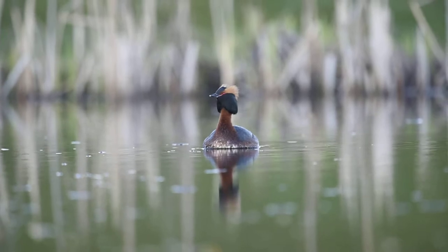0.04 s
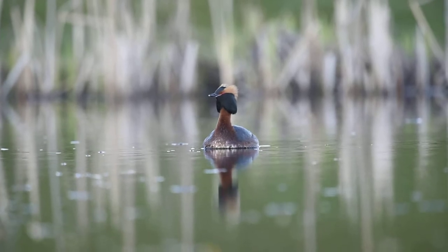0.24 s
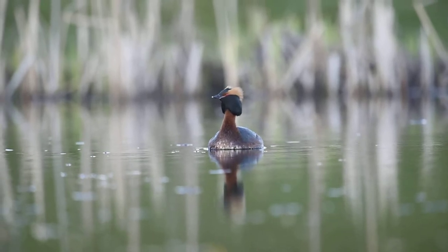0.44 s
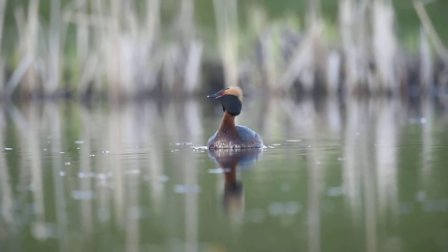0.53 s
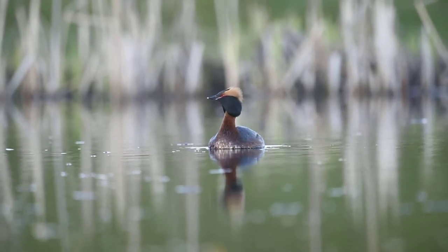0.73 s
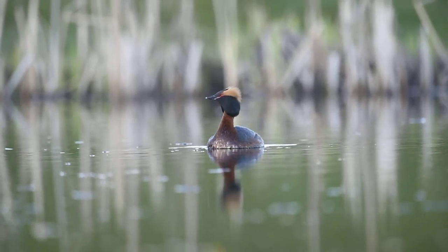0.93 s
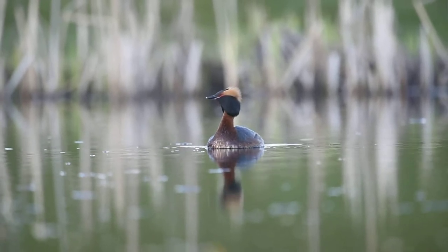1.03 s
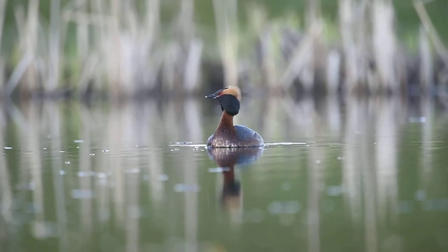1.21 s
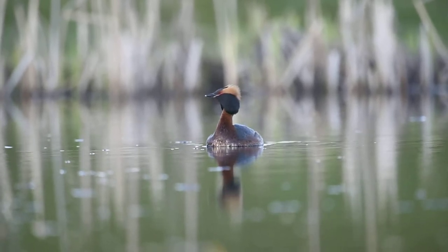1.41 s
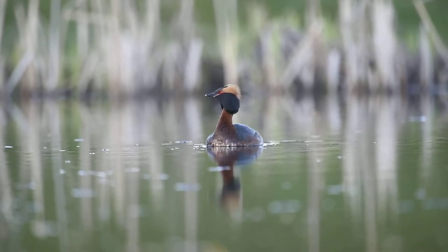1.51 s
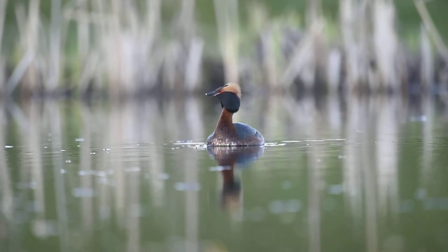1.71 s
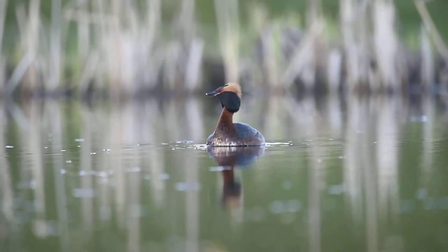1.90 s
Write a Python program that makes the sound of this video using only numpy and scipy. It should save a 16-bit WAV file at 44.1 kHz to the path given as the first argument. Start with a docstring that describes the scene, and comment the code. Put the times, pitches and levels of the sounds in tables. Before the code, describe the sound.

A waterbird on a calm pond gives a quick soft hoot at 0.45-0.52 s, then a thin quavering wail from 0.61 to 1.37 s, around 900-1000 Hz, sagging and turning rough and hoarse after 1.24 s, with a faint short echo. Irregular low wind thumps hit the microphone throughout, strongest near 0.93 s, over quiet hiss. Faint ticks come early, a tiny water plip at 1.5 s, and a distant fuzzy peep at 1.6-1.8 s.

```python
"""Waterbird on a calm pond

A waterbird gives a short hoot, then a thin wavering wail that ends hoarse: three gliding harmonics,
a band of rasp and a faint echo. Light wind is shaped noise plus low thumps of a few damped swings.
Under it lie a steady noise hiss, faint high noise ticks, a plip on the water made of three tiny
cosine bursts, and a far bird's peep from one fuzzy gliding tone."""
import sys
import numpy as np
from scipy import signal
from scipy.io import wavfile
from scipy.ndimage import uniform_filter1d

SR = 44100
rng = np.random.default_rng(int(sys.argv[2]) if len(sys.argv) > 2 else 0)


def to_wav(sig):
    """Store sig (one row per channel, or 1-D mono) as 16-bit WAV at the path in sys.argv[1].

    Samples outside -1..1 are clipped; the rate is SR.
    """
    pcm = np.clip(np.atleast_2d(sig), -1, 1) * 32767
    pcm = np.round(pcm).astype(np.int16)
    wavfile.write(sys.argv[1], SR, pcm.T)  # frames by channels


def rack_gain(trim_db):
    """Turn a fader trim in dB into the linear factor to multiply a signal by."""
    fader = np.asarray(trim_db, float)
    return 10 ** (fader / 20)


N = 85995  # samples in the scene


def evened(x):
    """Scales a signal to rms 1."""
    return x / np.sqrt(np.mean(x ** 2) + 1e-20)


def add(mix, start_s, sound):
    """Mixes a sound in from start_s, cutting what runs past the end."""
    part = mix[round(start_s * SR):][:len(sound)]
    part += sound[:len(part)]


def band_noise(count, band_hz):
    """White noise through a gentle band-pass."""
    band = signal.butter(2, band_hz, "band", fs=SR, output="sos")
    return signal.sosfilt(band, rng.standard_normal(count))


def slow(count, top_hz):
    """Smooth random motion of rms 1: low-passed noise, with the filter's first second dropped."""
    lowpass = signal.butter(2, top_hz, fs=SR, output="sos")
    return evened(signal.sosfilt(lowpass, rng.standard_normal(count + SR))[SR:])


def coloured(spectrum, patchy_db):
    """Noise of rms 1 from random short-time spectra, with patches in time and pitch that vary its level."""
    bin_hz = np.fft.rfftfreq(2048, 1 / SR)
    real, imaginary, patches = rng.standard_normal((N // 512 + 5, 1025, 3)).T
    patches = uniform_filter1d(patches, 20, 0)  # blur over pitch
    patches = evened(uniform_filter1d(patches, 6, 1))  # then over time
    point_hz, point_db = np.transpose(spectrum)
    shape_db = np.interp(np.log(bin_hz + 1), np.log(point_hz + 1), point_db, right=-90)[:, None]
    spectra = (real + 1j * imaginary) * rack_gain(shape_db + patchy_db * patches)
    return evened(signal.istft(spectra, nperseg=2048, noverlap=1536)[1][:N])


def hiss():
    """Steady noise bed whose spectrum falls towards the treble."""
    # hiss spectrum: pitch_hz, relative_density_db
    hiss_spectrum = [(120, -50), (200, -4), (315, -8.5), (385, -9.5), (755, -9.5), (858, -10.5),
                     (1090, -12.5), (1540, -14.5), (2420, -16), (3480, -19), (15500, -36)]
    return rack_gain(-58) * coloured(hiss_spectrum, patchy_db=-0.32)


def wind_rumble():
    """Low wind noise, strongest near 55 Hz, with uneven patches."""
    # rumble spectrum: pitch_hz, relative_density_db
    rumble_spectrum = [(15, -8), (30, -3), (55, 8.5), (100, -8), (160, -8.5), (260, -14), (450, -95)]
    return rack_gain(-53) * coloured(rumble_spectrum, patchy_db=2.0)


def wind_buffets():
    """Eddies shove the microphone: short low swings, each with a higher snap and a lower heave."""
    # eddies at the microphone: peak_s, main_swing_level_db, centre_pitch_hz, half_height_width_s
    buffets = [(0.245, -32.5, 85, 0.0093), (0.276, -31, 90.4, 0.01), (0.403, -35, 49.8, 0.012),
               (0.458, -33.5, 59.3, 0.017), (0.496, -31, 78, 0.023), (0.614, -30, 77.8, 0.007),
               (0.659, -40.5, 65.7, 0.018), (0.71, -37, 69.5, 0.012), (0.785, -37, 76.7, 0.016),
               (0.891, -39.5, 50.5, 0.022), (0.928, -19.5, 119.6, 0.0077), (0.944, -31.5, 89.2, 0.012),
               (1.016, -42, 94.3, 0.014), (1.178, -37.5, 54.3, 0.011), (1.241, -44.5, 82, 0.042),
               (1.337, -43, 67.8, 0.0083), (1.386, -41, 77.8, 0.026), (1.464, -32.5, 72.7, 0.019),
               (1.498, -38.5, 85.8, 0.013), (1.54, -33.5, 77, 0.013), (1.576, -32, 58.05, 0.01),
               (1.627, -48, 55.5, 0.018), (1.69, -42.5, 68.7, 0.012), (1.79, -40.5, 62, 0.011),
               (1.817, -47, 58.4, 0.016), (1.901, -36, 84.3, 0.0069), (0.309, -39, 39.3, 0.014),
               (.75, -47.5, 109, 0.0078), (1.278, -42, 89.7, 0.025)]
    skirt_width, skirt_gain = 3.75, rack_gain(-14.5)  # wide weak skirt: share of width, gain
    sag = 0.2986  # share by which the pitch rises at the peak and sags away from it
    snap_width, snap_db, snap_pitch = 0.49, -10.5, 1.99  # share of width, dB, share of pitch
    heave_width, heave_db, heave_pitch = 3.25, -7, 0.515  # likewise
    out = np.zeros(N)
    t = np.arange(-.1, .1, 1 / SR)
    for peak_s, level_db, hz, width_s in buffets:
        core, skirt, snap, heave = (
            np.exp(-4 * np.log(2) * (t / (width_s * share)) ** 2)
            for share in (1, skirt_width, snap_width, heave_width))
        phase = rng.random(3)  # in turns
        turns = np.cumsum(hz * (1 + sag * (2 * core - 1))) / SR
        envelope = (core + skirt_gain * skirt) / (1 + skirt_gain)
        shove = envelope * np.cos(2 * np.pi * (turns + phase[0]))
        shove += rack_gain(snap_db) * snap * np.cos(2 * np.pi * (snap_pitch * hz * t + phase[1]))
        shove += rack_gain(heave_db) * heave * np.cos(2 * np.pi * (heave_pitch * hz * t + phase[2]))
        add(out, peak_s - .1, rack_gain(level_db) * shove)
    return out


def high_ticks():
    """Faint ticks: band-passed noise under a very short bell envelope."""
    # ticks: time_s (the bell peaks 1 ms later), level_db at the peak
    ticks = [(0.0854, -72), (0.1047, -66), (0.2244, -66), (0.6174, -70)]
    centre_hz, width_hz, bell_s = 11800, 4800, 0.0007
    out = np.zeros(N)
    t = np.arange(-.005, .005, 1 / SR)
    for time_s, level_db in ticks:
        puff = evened(band_noise(len(t), [centre_hz - width_hz / 2, centre_hz + width_hz / 2]))
        add(out, time_s - .004, rack_gain(level_db) * np.exp(-.5 * (t / bell_s) ** 2) * puff)
    return out


def far_peep():
    """A far bird's gliding tone, made fuzzy by slow random motion of its level and phase."""
    # peep contour: time_s, pitch_hz, level_db before the fuzz
    peep = [(1.585, 3350, -85), (1.6, 3280, -71), (1.625, 3300, -68), (1.67, 3400, -72), (1.69, 3560, -65),
            (1.703, 2950, -71), (1.722, 3120, -67), (1.735, 3450, -67), (1.77, 3480, -71), (1.8, 3400, -84)]
    fuzz_hz = 70  # top rate of the random motion
    point_s, point_hz, point_db = np.transpose(peep)
    t = np.arange(point_s[0], point_s[-1], 1 / SR)
    fuzz = .8 + .5 * slow(len(t), fuzz_hz) + .5j * slow(len(t), fuzz_hz)
    turns = np.cumsum(np.interp(t, point_s, point_hz)) / SR
    tone = (fuzz * np.exp(2j * np.pi * turns)).real
    out = np.zeros(N)
    add(out, point_s[0], rack_gain(np.interp(t, point_s, point_db)) * tone)
    return out


def water_plip():
    """A plip on the water: three tiny cosine bursts under bell envelopes."""
    # bursts: peak_s, envelope_peak_db, pitch_hz
    plip = [(1.4968, -46, 1500), (1.4988, -40.5, 1750), (1.5035, -46.5, 1500)]
    bell_s = .00038
    out = np.zeros(N)
    t = np.arange(-.005, .005, 1 / SR)
    for peak_s, level_db, hz in plip:
        burst = np.cos(2 * np.pi * (hz * t + rng.random()))
        add(out, peak_s - .005, rack_gain(level_db) * np.exp(-.5 * (t / bell_s) ** 2) * burst)
    return out


def call(contour):
    """Three harmonics on a wavering pitch; roughness shakes pitch and level, a broken voice throbs."""
    hoarse_from_s, hoarse_rise_s = 1.235, .02  # the voice breaks at the end of the wail
    roughness, hoarse_extra = .14, .5
    jitter, jitter_hz = .1, 130  # pitch share at roughness 1, top rate
    flutter_db, flutter_hz = 6, 90  # level swing at roughness 1, top rate
    throb_hz, throb_db, throb_bend = 58, 3.5, .07  # rate, level swing, pitch share
    rasp_db, rasp_band_hz, rasp_lead_s = -7, (2200, 3600), .05  # rasp rms against harmonic 3's peak
    edge_s = .008

    point_s, point_hz, *harmonics_db = np.transpose(contour)
    t = np.arange(point_s[0], point_s[-1], 1 / SR)
    broken = np.clip((t - hoarse_from_s) / hoarse_rise_s, 0, 1)
    rough = roughness + hoarse_extra * broken
    throb = broken * np.cos(2 * np.pi * throb_hz * (t - hoarse_from_s - hoarse_rise_s))

    shake = slow(len(t), jitter_hz)
    shake = shake - uniform_filter1d(shake, size=SR // 40)  # quick tremor only, no drift
    pitch_hz = np.interp(t, point_s, point_hz) * (1 + jitter * rough * shake + throb_bend * throb)
    turns = np.cumsum(pitch_hz) / SR
    voice = np.zeros(len(t))
    for number, level_db in enumerate(harmonics_db, 1):
        voice += rack_gain(np.interp(t, point_s, level_db)) * np.sin(2 * np.pi * number * turns)

    # breathy rasp fades in just ahead of the break and follows harmonic 3
    rasp = evened(band_noise(len(t), rasp_band_hz))
    rasp_fade = np.clip(1 + (t - hoarse_from_s) / rasp_lead_s, 0, 1)
    voice += rasp_fade * rack_gain(rasp_db + np.interp(t, point_s, harmonics_db[-1])) * rasp

    sway_db = flutter_db * rough * (slow(len(t), flutter_hz) - rough) + throb_db * throb
    edges = np.clip(np.minimum(t - point_s[0], point_s[-1] - t) / edge_s, 0, 1)
    return point_s[0], np.sqrt(2) * edges * rack_gain(sway_db) * voice  # sqrt(2): sine levels become rms


def bird():
    """The hoot and the wail, with a decaying noise tail for their faint scatter from the reeds behind."""
    # call contours: time_s, pitch_hz, then harmonic_1_db, harmonic_2_db, harmonic_3_db (rms before flutter)
    hoot = [(.445, 690, -70, -88, -88), (.453, 720, -60, -80, -84), (.465, 770, -57, -72, -72),
            (.474, 860, -55.5, -66, -59), (.482, 828, -54, -62, -56), (.491, 800, -55, -63, -61),
            (.498, 740, -61, -67, -66), (.52, 670, -70, -88, -90)]
    wail = [(.61, 581.5, -72, -85, -85), (.622, 702.6, -60, -78, -72), (.63, 792.6, -58, -75, -61),
            (.638, 891, -56, -65, -58), (.647, 900.6, -57.5, -64, -57), (.662, 902, -58.5, -66, -62),
            (.678, 964, -58, -61.5, -60.5), (.702, 912, -59, -65, -60.5), (.72, 812.6, -56, -65.5, -57),
            (0.749, 885, -61, -65, -62), (.766, 795, -58.5, -69, -61), (.784, 911.5, -59, -64, -59),
            (0.801, 996.3, -57, -64, -59.5), (.85, 984, -58.5, -65, -61), (0.86, 945, -60, -65, -63),
            (0.906, 956, -58.5, -65, -63), (.935, 980.7, -57, -62, -61), (.947, 1004, -58, -64, -60),
            (.982, 985.4, -57, -60.5, -62.5), (.99, 933, -58, -63, -60), (1.003, 960, -57, -63.5, -61.5),
            (1.055, 994.3, -60, -64, -64), (1.085, 945, -61, -65, -64), (1.105, 911.3, -61.5, -64, -63),
            (1.12, 925.3, -62, -65, -62.5), (1.149, 903.4, -61.5, -63.5, -64),
            (1.21, 884.3, -62, -64.5, -62), (1.235, 868.6, -61, -65, -64), (1.26, 814, -64, -65, -64),
            (1.295, 860, -58.5, -64, -64), (1.32, 790, -61, -63, -64), (1.347, 802, -63, -68, -69),
            (1.368, 748, -74, -74, -77)]
    echo_db, echo_t60_s = -12, .2
    out = np.zeros(N)
    for contour in (hoot, wail):
        add(out, *call(contour))
    t = np.arange(SR // 2) / SR
    tail = rng.standard_normal(len(t)) * rack_gain(-60 * t / echo_t60_s) * (t > .01)  # 10 ms gap
    echo = signal.fftconvolve(out, tail / np.linalg.norm(tail))[:N]
    return out + rack_gain(echo_db) * echo


def scene():
    """Hiss, wind, small sounds and the bird on one channel."""
    wind = wind_rumble() + wind_buffets()
    small_sounds = high_ticks() + far_peep() + water_plip()
    return (hiss() + wind + small_sounds + bird())[None]


def low_pass(x):
    """Removes everything above the highest recorded frequency."""
    return signal.sosfilt(signal.butter(12, 15630, fs=SR, output="sos"), x)


def record(dry):
    """The microphone's soft top, a gentle low-pass, finishes the mix."""
    mic_top = signal.butter(2, 14100, fs=SR, output="sos")  # Hz
    finished = signal.sosfilt(mic_top, dry)
    return low_pass(finished)


dry = scene()
out = record(dry)
to_wav(out)
```